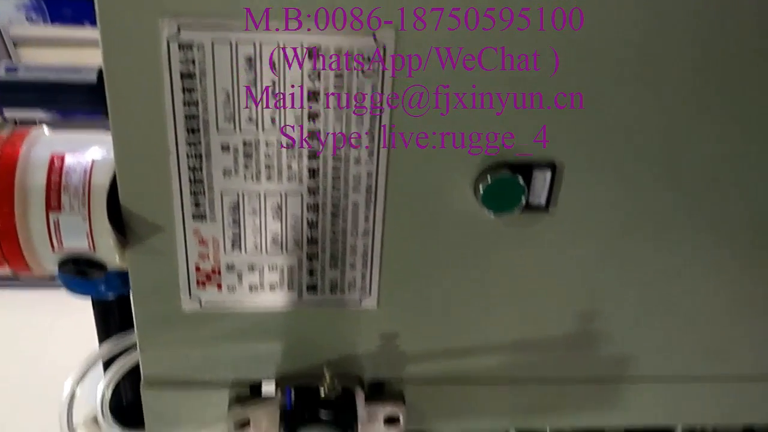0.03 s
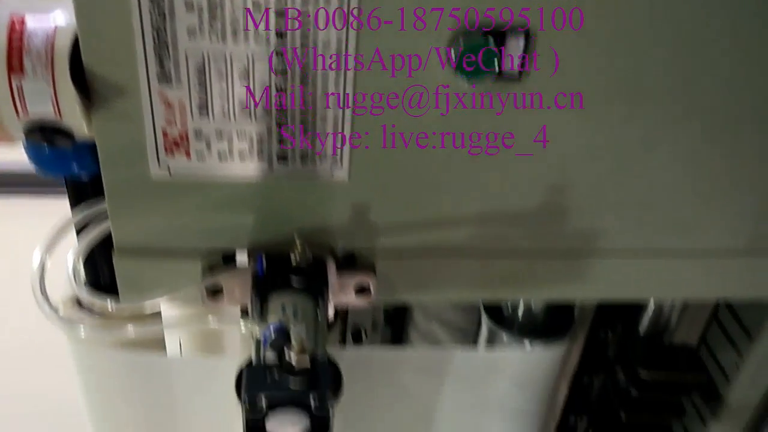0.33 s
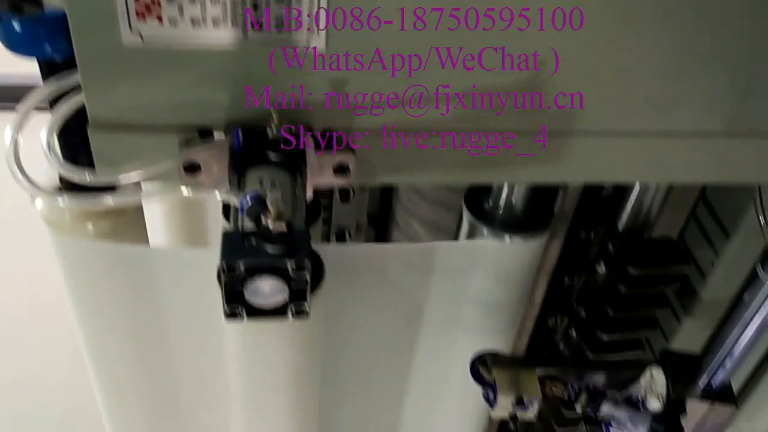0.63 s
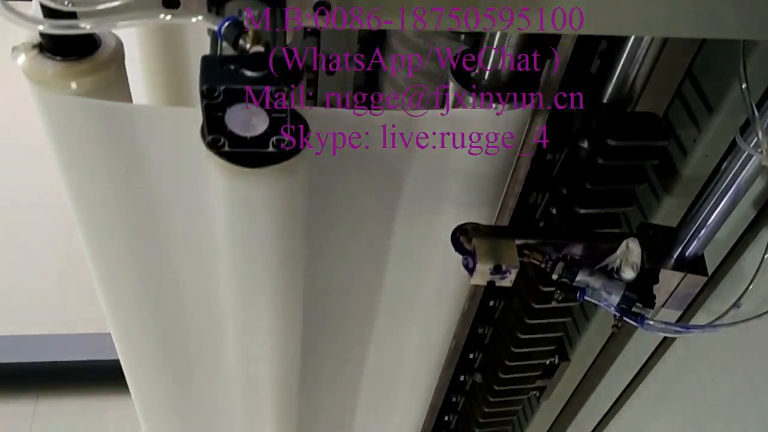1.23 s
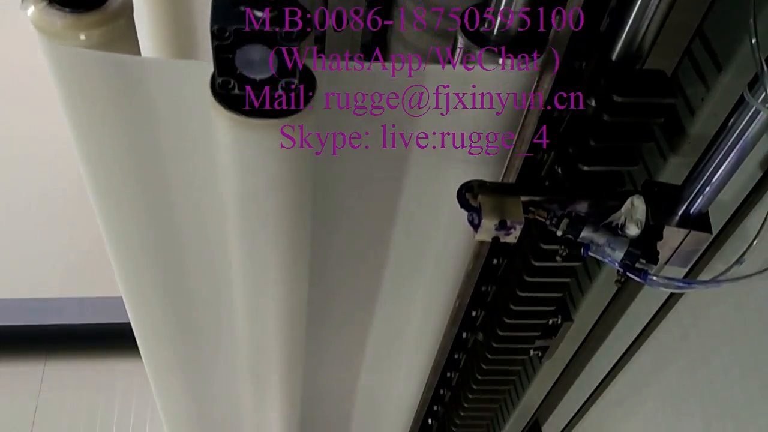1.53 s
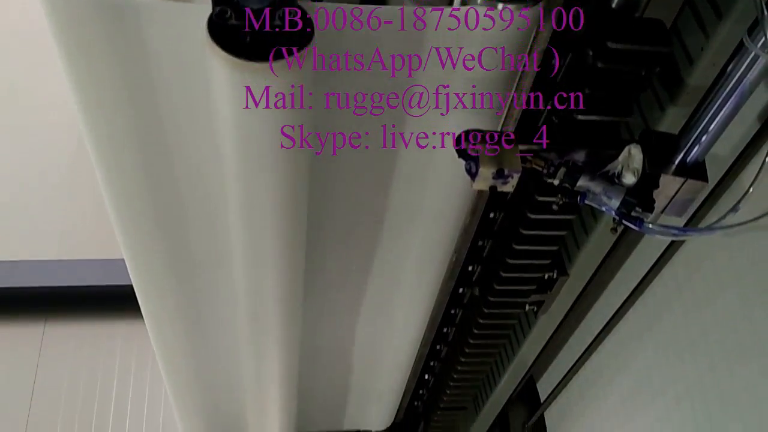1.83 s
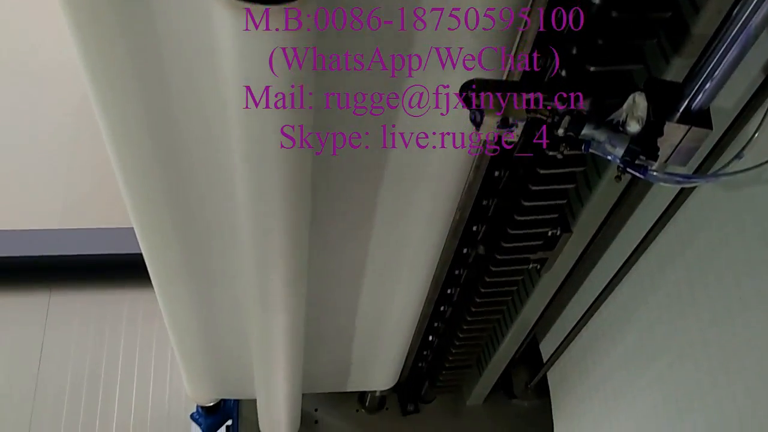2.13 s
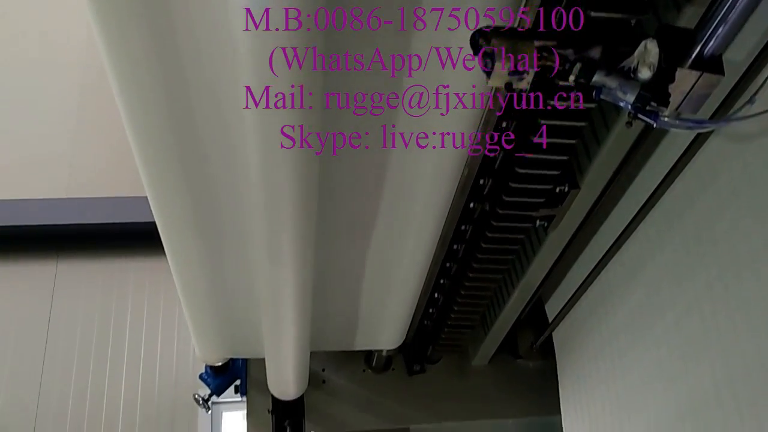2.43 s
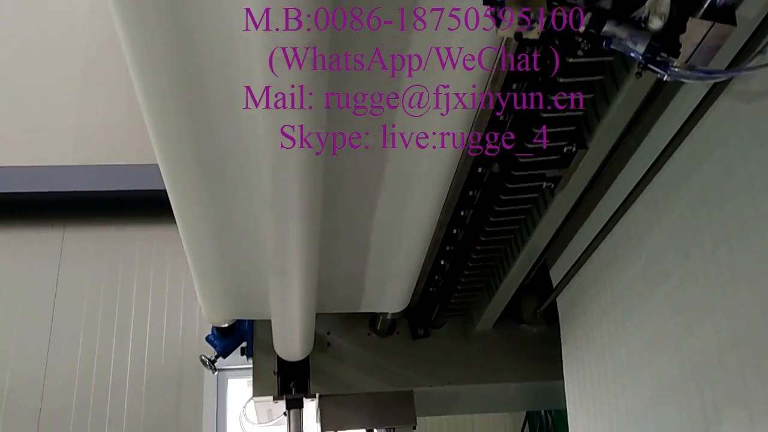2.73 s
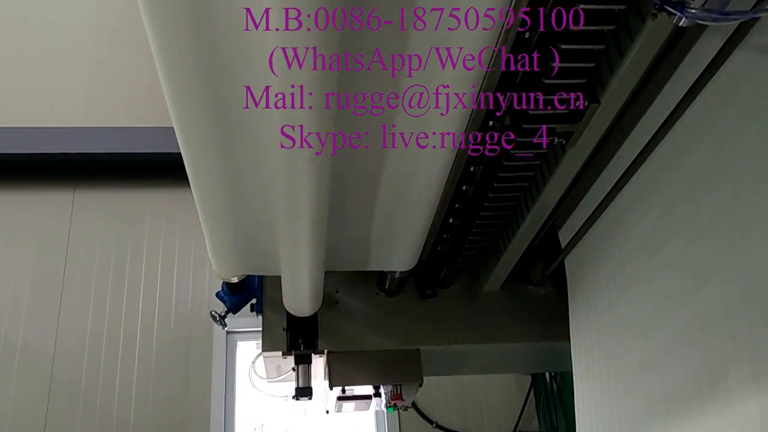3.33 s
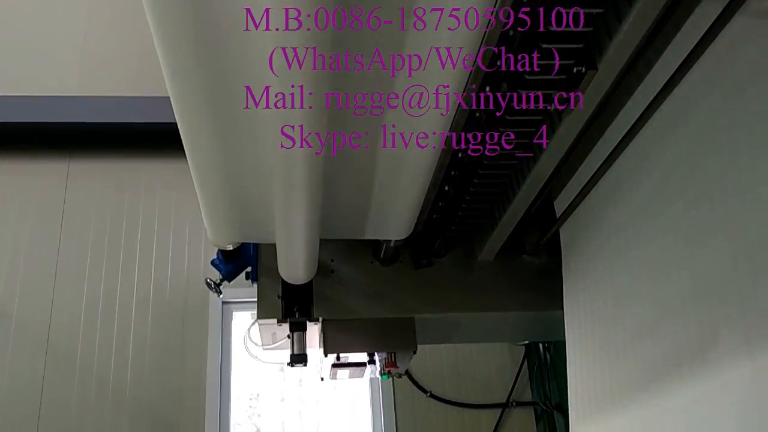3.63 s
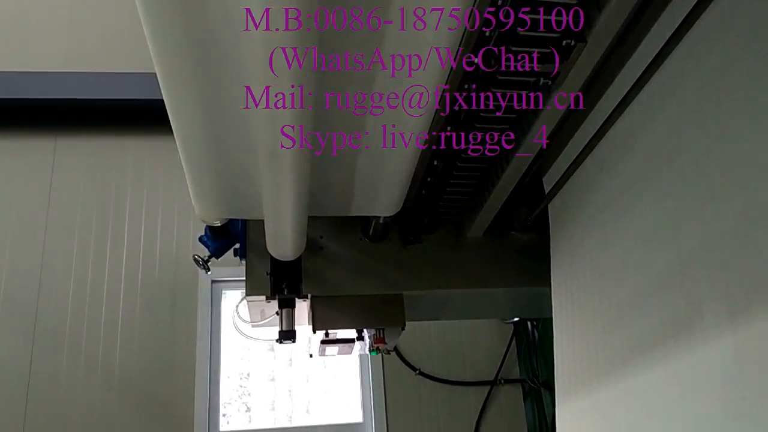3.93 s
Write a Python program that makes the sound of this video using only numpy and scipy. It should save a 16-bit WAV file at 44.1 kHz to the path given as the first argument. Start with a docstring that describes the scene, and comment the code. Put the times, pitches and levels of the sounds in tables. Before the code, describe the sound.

A tissue folding machine runs close by in a factory hall, its jaws shutting with bright, rattling clacks almost five times a second. Tiny squeaks, chirps and paper rustles accompany each stroke over a steady roller drone and hiss.

```python
"""A tissue folding machine runs close by in a factory hall, almost five strokes a second.
In every stroke the cam (a turning part that drives the jaws) chirps, paper rustles through the rollers,
and the folding jaws shut with a bright, rattling clack and let go with a tiny squeak.
Gears and rollers drone on, and a motor hums up to speed and fades.
An automatic gain control turns the whole sound down briefly after each loud clack."""
import sys
import numpy as np
from scipy import signal
from scipy.fft import rfft, irfft, next_fast_len
from scipy.io import wavfile
from scipy.ndimage import minimum_filter1d, map_coordinates

SR = 44100
rng = np.random.default_rng(int(sys.argv[2]) if len(sys.argv) > 2 else 0)


def generate_wav(signal):
    """Clip the signal to [-1, 1] and save it as 16-bit WAV at the path in sys.argv[1]."""
    frames = np.transpose(np.atleast_2d(signal))
    scaled = np.clip(frames, -1, 1) * 32767
    pcm = np.round(scaled).astype(np.int16)
    wavfile.write(sys.argv[1], SR, pcm)


N = 176400
TIME = np.arange(N) / SR
GEAR_WANDER_HZ = 2.96

# One row per stroke: jaws let go t/s, clack level/dB, clack length/s, squeak level/dB, clack width/dB
STROKES = [(0.062, -7, 0.015, -1.5, -27), (0.269, -4.5, 0.014, 1.5, -18), (0.4793, -8.5, 0.027, 1.5, -3.5),
           (0.69, -8.5, 0.022, 0, -1), (0.899, -3.5, 0.023, 3, -8), (1.108, -3.5, 0.017, -2, -9),
           (1.3182, -9.5, 0.022, 1, 4.5), (1.529, -2.5, 0.016, 1.5, -14), (1.7392, -3.5, 0.016, -0.5, -11),
           (1.9488, -6, 0.02, 2, -1.5), (2.1598, -4, 0.016, 0.5, 1.5), (2.3682, -1.5, 0.014, -2, -2),
           (2.5788, -5.5, 0.02, -2, -34), (2.788, -3.5, 0.021, -13, -34), (2.998, -3.5, 0.017, -3.5, -31),
           (3.207, -6.5, 0.019, -12, -6), (3.4172, -6.5, 0.019, -18, -1.5), (3.6277, -5, 0.02, -16, -10),
           (3.838, -8, 0.02, -7, -18)]


def clacks(lead_s=0.0361, rise_s=0.0021, fall_s=0.0058):
    """The jaws shut in a fast rattle that makes the steel ring; some clacks sound wider than others."""
    colour = [(300, -46.5), (1200, -20), (2300, -11), (4100, -3.5), (4900, 3), (5500, 0.5), (5900, 5.5),
              (7400, 3), (8300, 0.5), (9400, 2.5), (10500, -10.5)]  # tone colour of the clack: f/Hz, level/dB
    spread = [(1500, 0), (4000, -11), (6500, -8.5), (9500, 0)]  # how its stereo width changes with pitch: f/Hz, side level/dB
    jaw_rings = [(2870, 130, 0), (3600, 130, 0), (6448, 40, 12), (7163, 60, 9), (8154, 50, 5)]  # where the jaws ring: f/Hz, bandwidth/Hz, level/dB
    force = np.zeros((2, N))  # middle and side
    for s, db, length_s, _, side_db in STROKES:
        span, t = near(s - lead_s)
        force[:, span] += amp([[db], [db + side_db]]) * burst(t, rise_s, length_s - fall_s / 2, fall_s)
    rattle = unit(amp(-0.5 * wobble(per_s=450)))
    return stereo(*(force * rattle * rush(colour, spread, jaw_rings)))


def squeaks(rise_s=0.0007, fall_s=0.0018, wander_hz=50, tick_lead_s=0.001, ring_hz=(5010, 5620, 6950)):
    """The jaws let go with a tick and a squeak. Over the strokes the squeak gives way to a steel ring."""
    pitches = [(.9, 5240), (1.8, 5360), (2.5, 5560)]  # the squeak creeps upward: t/s, f/Hz
    ring_levels = [(1.8, -19), (3, -10.5)]  # the ring grows: t/s, level/dB
    tick_colour = [(300, -57), (2000, 2), (3800, -3.5), (4600, -2), (5000, 6.5), (5700, 9), (6400, -5),
                   (6950, 2), (7800, -15), (8800, 7.5), (10500, -29)]  # tone colour of the tick: f/Hz, level/dB
    tone, tick = np.zeros((2, N))
    rough = drift(wander_hz, per_s=1500)
    for s, _, _, db, _ in STROKES:
        span, t = near(s)
        shape = np.where(t < 0, swell(t, rise_s), swell(t, fall_s))
        tone[span] += amp(db) * shape * np.sin(2 * np.pi * curve(pitches, s) * t + rough[span])
        ring_shape = burst(t + tick_lead_s, rise_s, hold_s=0, fall_s=0.0045)
        ring = sum(np.sin(2 * np.pi * (rng.normal(hz, wander_hz) * t + rng.random())) for hz in ring_hz)
        tone[span] += amp(curve(ring_levels, s)) * ring_shape * ring
        tick[span] += burst(t + tick_lead_s, rise_s, hold_s=0.004, fall_s=0.0035)
    return tone + amp(-8) * tick * noise(tick_colour)


def cam(scatter_s=0.00074, scatter_db=0.7):
    """The cam rubs and gives short chirps at nearly the same points of every stroke."""
    chirps = [(.126, 2130, -13, .0025), (.1195, 2170, -15, .002), (.101, 1590, -18, .002),
              (.023, 1650, -15, .002), (.0178, 2120, -9, .0022)]  # each chirp: time before the jaws let go/s, f/Hz, level/dB, half length/s
    sound = np.zeros(N)
    rough = drift(wander_hz=70, per_s=600)
    for s in stroke_times():
        for lead_s, hz, db, width_s in chirps:
            late, loud = rng.standard_normal(2)
            span, t = near(s - lead_s + scatter_s * late)
            tone = np.sqrt(2) * np.sin(2 * np.pi * hz * t + rough[span])
            sound[span] += amp(db + scatter_db * loud) * swell(t, width_s) * tone
    return amp(-0.5) * sound


def paper():
    """The paper rustles twice a stroke, as it is drawn in and as it is creased."""
    rustles = [(0.1198, -14), (0.011, -12)]  # each rustle: time before the jaws let go/s, level/dB
    colour = [(500, -27), (1800, 5), (3000, 1.5), (4300, -3), (5400, -1), (7000, -11)]  # tone colour of the paper: f/Hz, level/dB
    pull = np.zeros(N)
    for s in stroke_times():
        for lead_s, db in rustles:
            span, t = near(s - lead_s)
            pull[span] += amp(db) * swell(t, width_s=0.0076)
    return pull * noise(colour)


def thumps(hz=42, width_s=0.0058):
    """Some strokes bump the frame with one dull, low push."""
    bumps = [(0.066, -33), (.458, -39), (2.342, -39)]  # each bump: t/s, level/dB
    return sum(amp(db) * swell(TIME - s, width_s) * np.sin(2 * np.pi * hz * (TIME - s))
               for s, db in bumps)


def drone(flutter_db=0.5, grain_db=0.85, sway_db=0.95):
    """The rollers rumble, the frame roars and the moving sheet of paper hisses, all a little unevenly."""
    roller_levels = [(0, -21.5), (.9, -20), (1.6, -21), (3, -21), (4, -22.5)]  # loudness of the rumble: t/s, level/dB
    roller_colour = [(70, -42), (150, -12.5), (185, -7.5), (215, 0), (255, 1), (298, -1), (322, -2.5),
                     (375, 0.5), (470, -7), (560, -6.5), (720, -6.5), (920, -3.5), (1080, -10.5),
                     (2000, -31)]  # tone colour of the rumble: f/Hz, level/dB
    frame_colour = [(200, -31), (900, -15.5), (1250, -2.5), (1550, 0.5), (1720, -1.5), (1850, -1.5),
                    (2200, -3), (2500, -10), (3300, -12), (4500, -23.5)]  # tone colour of the roar: f/Hz, level/dB
    sheet_colour = [(500, -42), (2500, 2.5), (4100, 2.5), (4900, 4.5), (5500, 4), (6400, 0.5), (7500, 0),
                    (8000, 5.5), (8500, 0.5), (9400, 4), (10500, -8.5)]  # tone colour of the hiss: f/Hz, level/dB
    rollers = amp(curve(roller_levels, TIME) + flutter_db * wobble(24.88)) * noise(roller_colour)
    frame = amp(-18.5 + flutter_db * wobble(60)) * noise(frame_colour)
    sheet = amp(-19.5 + grain_db * wobble(1100) + sway_db * wobble(8.42)) * noise(sheet_colour)
    return rollers + frame + sheet


def gears(sway_db=3):
    """The gears and drive sing steady notes that waver in loudness and pitch."""
    notes = [(216, -36, -34), (611, -38, -42), (927, -44.5, -39)]  # each note: f/Hz, start level/dB, end level/dB
    sound = np.zeros(N)
    for hz, start_db, end_db in notes:
        level = amp(np.linspace(start_db, end_db, N) + sway_db * wobble(12))
        sound += level * np.sqrt(2) * np.sin(2 * np.pi * hz * TIME + drift(GEAR_WANDER_HZ, 15))
    return sound


def motor():
    """The motor's hum rises with its speed and sinks into the drone."""
    run_up = [(0, 111, -31.5), (.5, 125, -30.5), (1.1, 127, -33), (2, 130, -48)]  # the motor speeds up: t/s, base f/Hz, level/dB
    s, hz, db = np.transpose(run_up)
    phase = 2 * np.pi * np.cumsum(np.interp(TIME, s, hz)) / SR
    hum = sum(np.sin(harmonic * phase + drift(GEAR_WANDER_HZ, 20)) for harmonic in (2, 3, 4))
    return amp(np.interp(TIME, s, db)) * np.sqrt(2) * hum


def hall(x, echo_s=0.31):
    """The factory hall answers with a smooth echo that fades by 60 dB in echo_s."""
    t = TIME[:SR // 2]
    tail = rng.standard_normal((2, len(t))) * amp(-60 * t / echo_s)
    return signal.fftconvolve(x, tail / np.linalg.norm(tail[0]), axes=1)[:, :N]


def stroke_times():
    """The time of every stroke, plus the next one that is on its way."""
    s = np.array(STROKES)[:, 0]
    return np.append(s, s[-1] + np.diff(s).mean())


def noise(colour):
    """Stereo noise as wide as the machine."""
    spread = [(80, -5), (200, -23.5), (2200, -26), (3600, -21), (5500, -10.5), (9000, -6.5)]  # the machine's stereo width: f/Hz, side level/dB
    return stereo(*rush(colour, spread))


def rush(colour, spread, rings=()):
    """Noise with a tone colour and ringing peaks, as a middle of strength 1 and a side signal."""
    def response(f):
        peaks = sum(amp(db) ** 2 / (1 + (2 * (f - hz) / width) ** 2) for hz, width, db in rings)
        power = amp(along(colour, f)) ** 2 + peaks
        return np.sqrt(power) * [np.ones_like(f), amp(along(spread, f))]
    pair = filtered(rng.standard_normal((2, N)), response)
    return pair / pair[0].std()


def stereo(mid, side):
    """Left and right: the louder the side signal, the wider the sound."""
    return np.array([mid + side, mid - side])


def amp(db):
    """Turn decibels into a gain."""
    return 10 ** (np.asarray(db) / 20)


def unit(x):
    """Scale to an average strength (rms) of 1."""
    return x / np.sqrt(np.mean(x ** 2) + 1e-20)


def curve(points, s):
    """Join (t/s, value) points with straight lines and read the value at s."""
    return np.interp(s, *np.transpose(points))


def along(points, hz):
    """Join (f/Hz, value) points on a log frequency scale and read the value at hz."""
    f, v = np.transpose(points)
    return np.interp(np.log(hz + 1), np.log(f + 1), v)


def wobble(per_s):
    """A smooth curve through per_s random values a second."""
    return map_coordinates(rng.standard_normal(N // 8), [TIME * per_s], mode="wrap")


def drift(wander_hz, per_s):
    """Extra phase that makes a tone's pitch wander at random."""
    return 2 * np.pi * wander_hz * np.cumsum(wobble(per_s)) / SR


def filtered(x, response):
    """Scale each frequency in x by the gain that response gives it."""
    size = next_fast_len(N + SR // 4)
    return irfft(rfft(x, size) * response(np.fft.rfftfreq(size, 1 / SR)), size)[..., :N]


def near(s):
    """The samples around a moment, and their time from it."""
    span = slice(max(0, int(s * SR) - SR // 10), max(0, int(s * SR) + SR // 10))
    return span, TIME[span] - s


def burst(t, rise_s, hold_s, fall_s):
    """A level that rises, holds and dies away."""
    return (1 - np.exp(-np.maximum(t, 0) / rise_s)) * np.exp(-np.maximum(t - hold_s, 0) / fall_s)


def swell(t, width_s):
    """A bell-shaped rise and fall in level."""
    return np.exp(-.5 * (t / width_s) ** 2)


def scene(low_cut_hz=82):
    """The strokes in the hall, over the drone; the small moving parts give off little bass."""
    strokes = clacks() + squeaks() + cam() + paper()
    machine = strokes + amp(-19.5) * hall(strokes) + drone() + gears() + motor()
    return filtered(machine, lambda hz: hz ** 2 / (hz ** 2 + low_cut_hz ** 2)) + thumps()


def record(dry):
    """Gain control grabs each peak, holds and lets go; what slips past is clipped; the treble is cut."""
    limit_db, top_hz = -1.5, 10480
    grab_s, hold_s, release_s = 0.004, 0.049, 0.059
    over_db = np.maximum(20 * np.log10(np.abs(dry).max(axis=0) + 1e-9) - limit_db, 0)
    hold = 2 * int(hold_s * SR / 2) + 1
    held_db = -minimum_filter1d(-over_db, hold, origin=hold // 2, mode="constant")
    release = TIME / release_s
    cut_db = np.exp(np.maximum.accumulate(np.log(held_db + 1e-9) + release) - release)  # each cut fades
    smooth = np.exp(-1 / (grab_s * SR))
    ducked = dry * amp(-signal.lfilter([1 - smooth], [1, -smooth], cut_db))
    clipped = ducked / (1 + ducked ** 8) ** (1 / 8)
    return filtered(clipped, lambda hz: 1 / np.sqrt(1 + (hz / top_hz) ** 120))


dry = scene()
out = record(dry)
generate_wav(out)
```